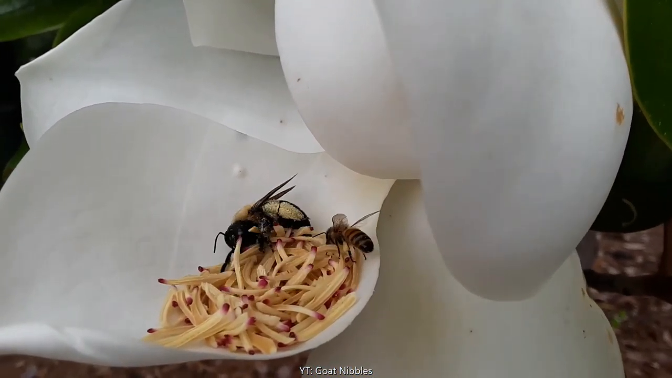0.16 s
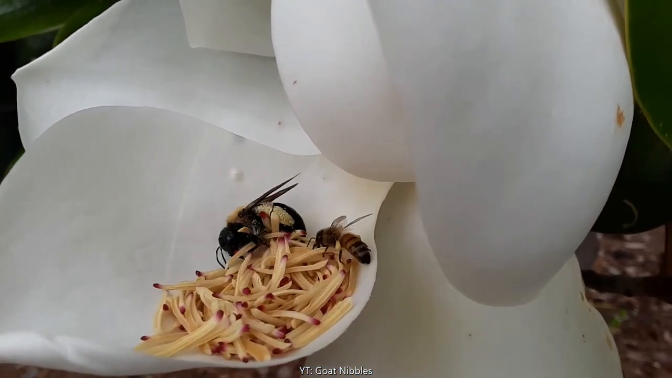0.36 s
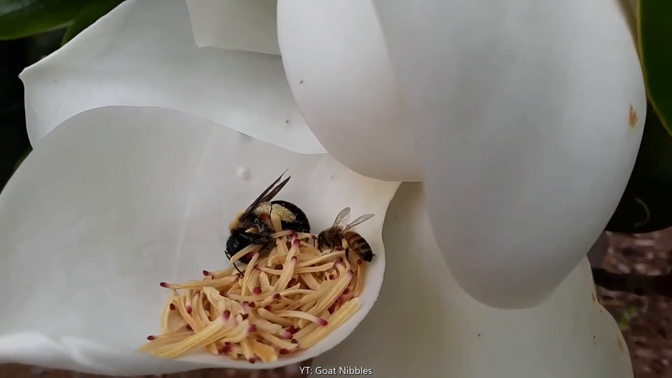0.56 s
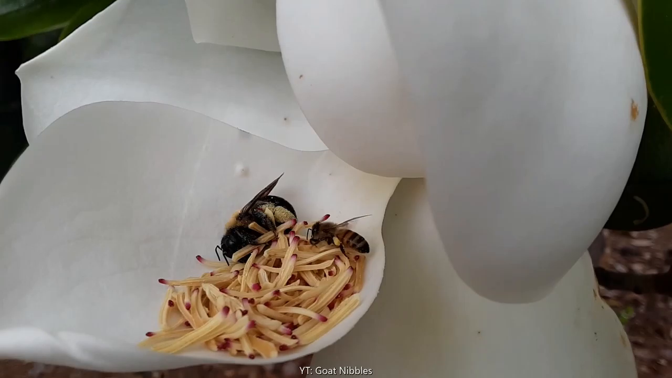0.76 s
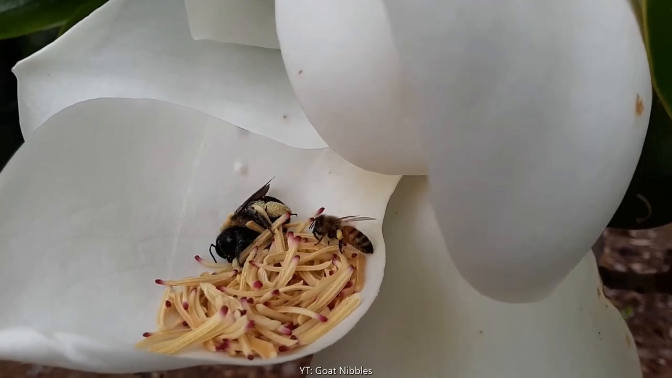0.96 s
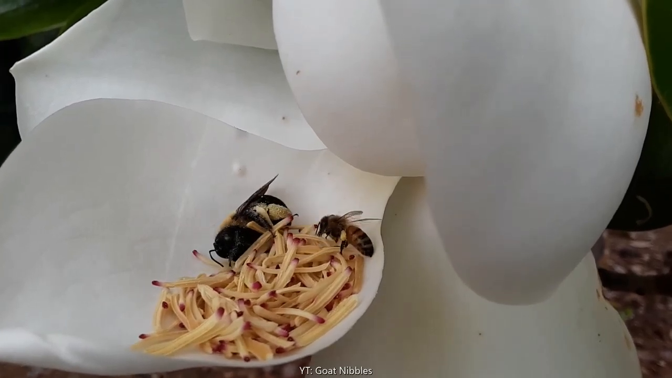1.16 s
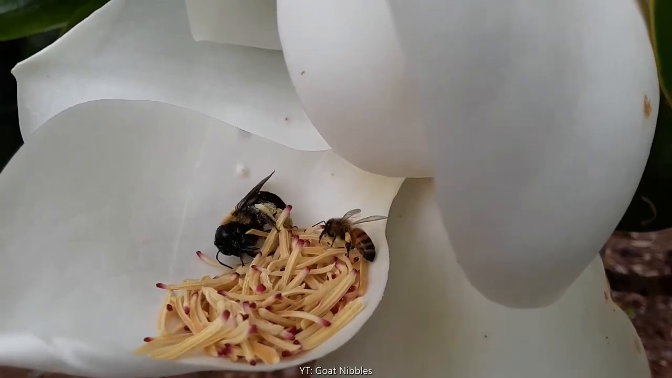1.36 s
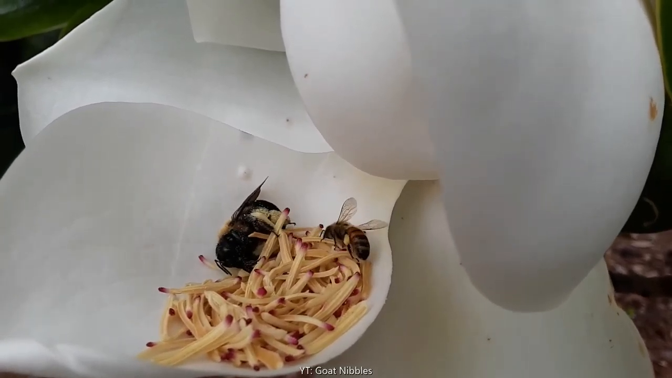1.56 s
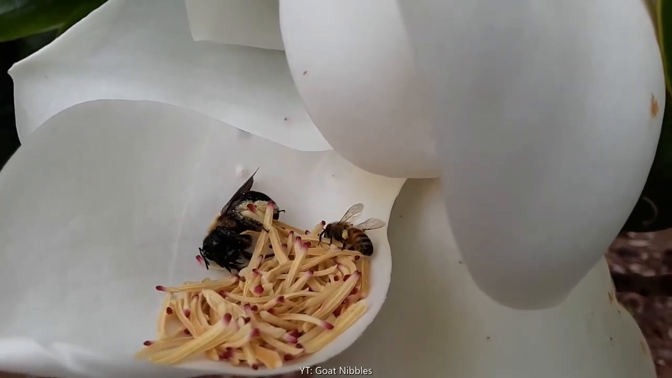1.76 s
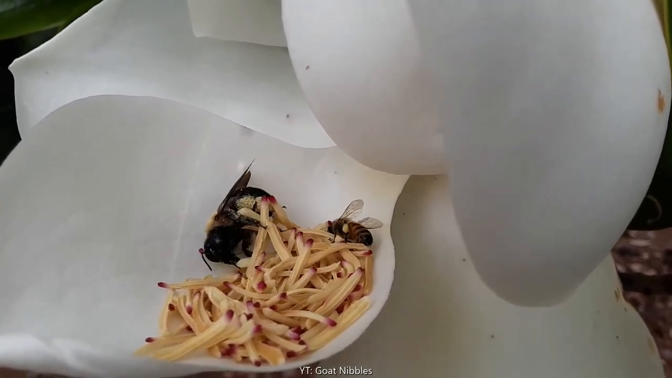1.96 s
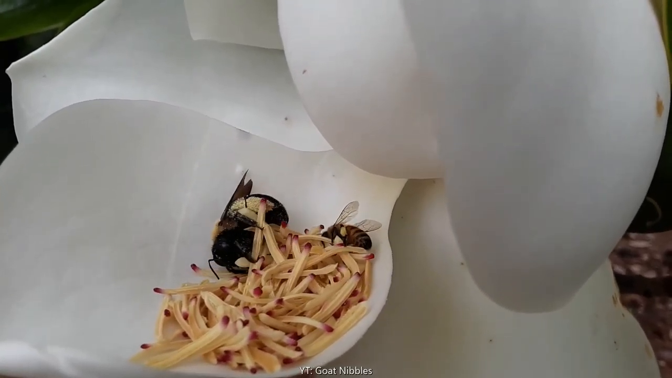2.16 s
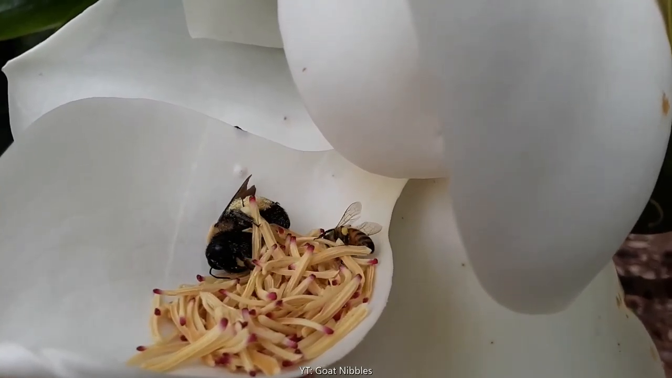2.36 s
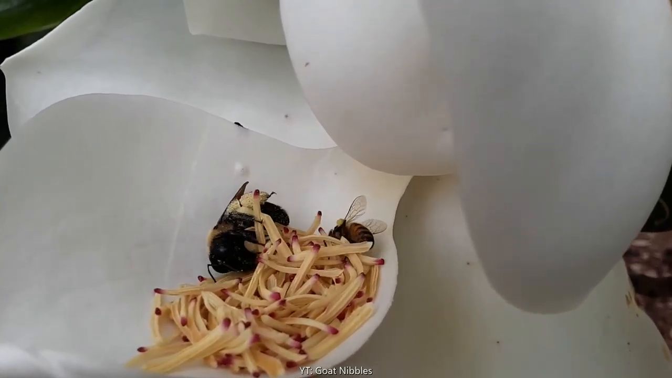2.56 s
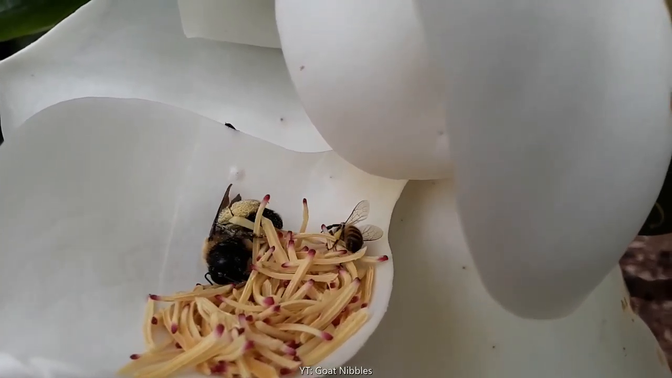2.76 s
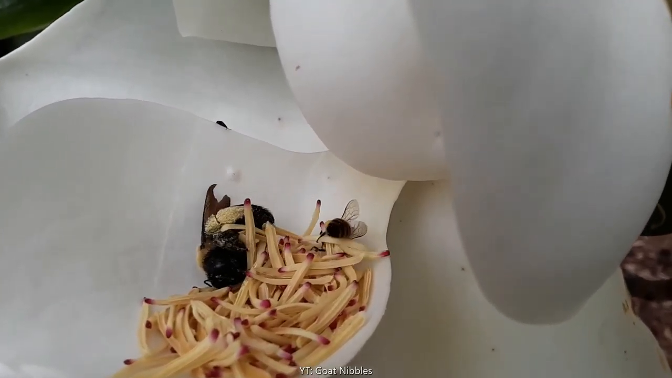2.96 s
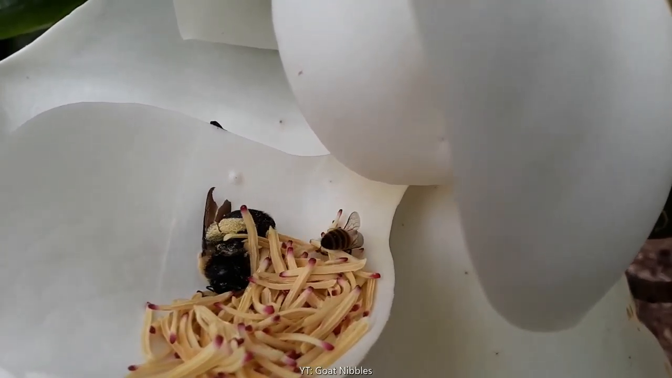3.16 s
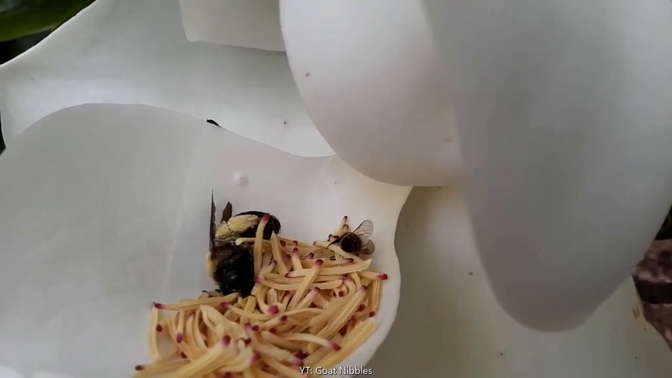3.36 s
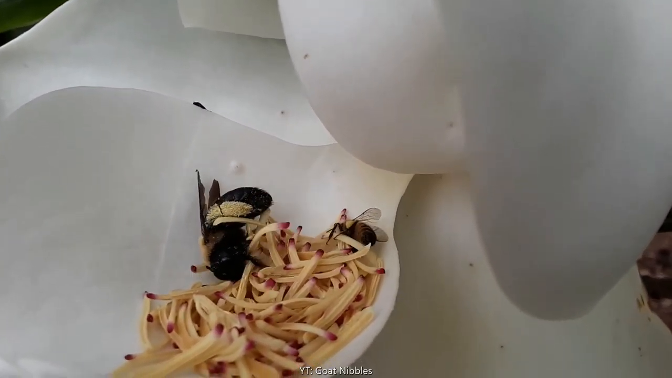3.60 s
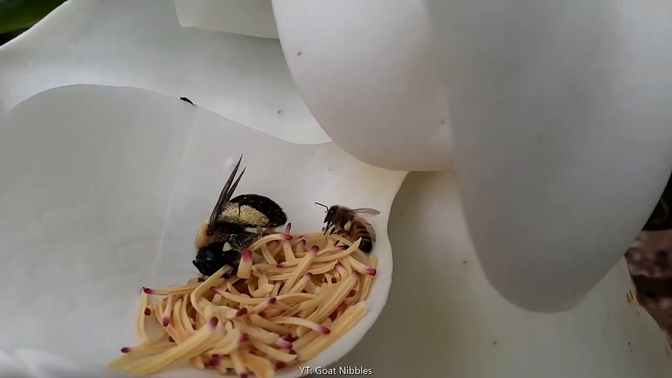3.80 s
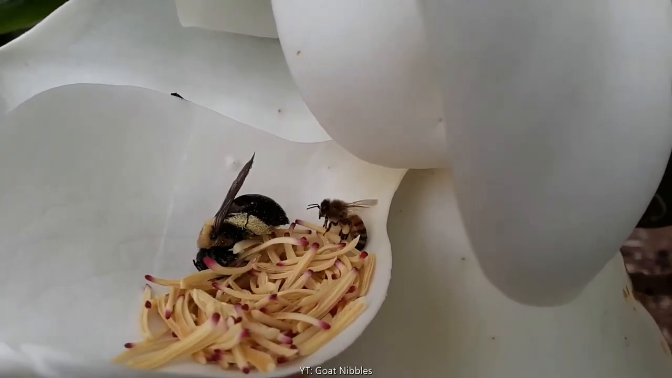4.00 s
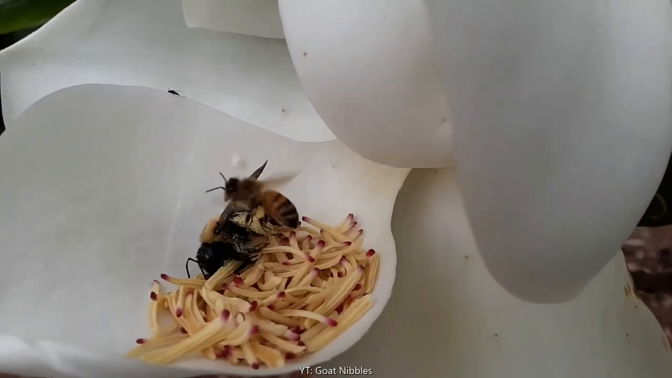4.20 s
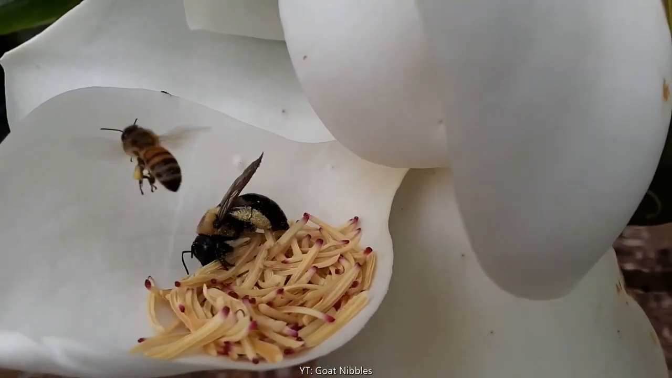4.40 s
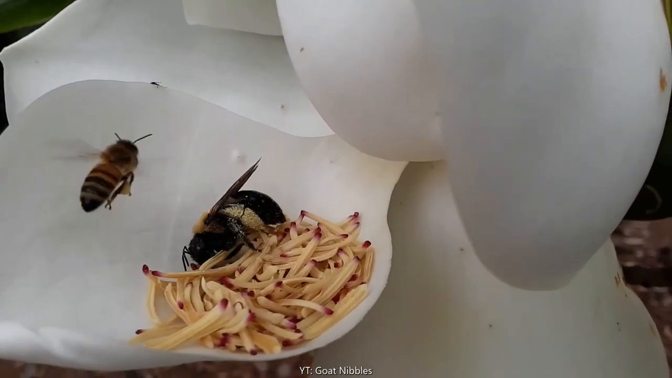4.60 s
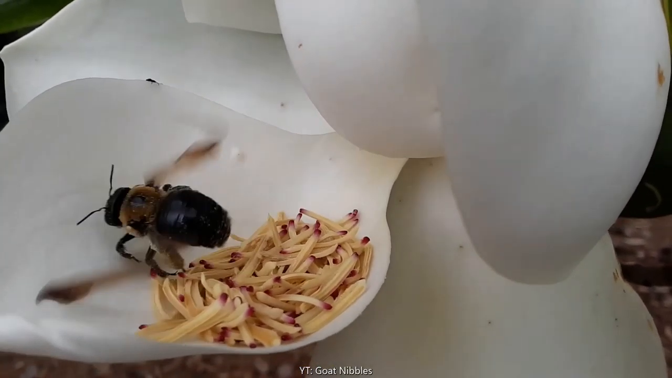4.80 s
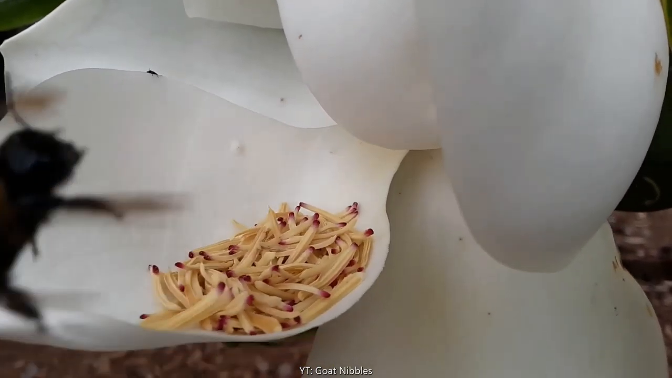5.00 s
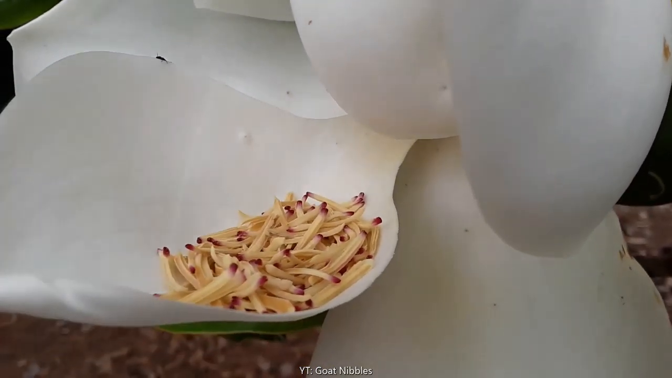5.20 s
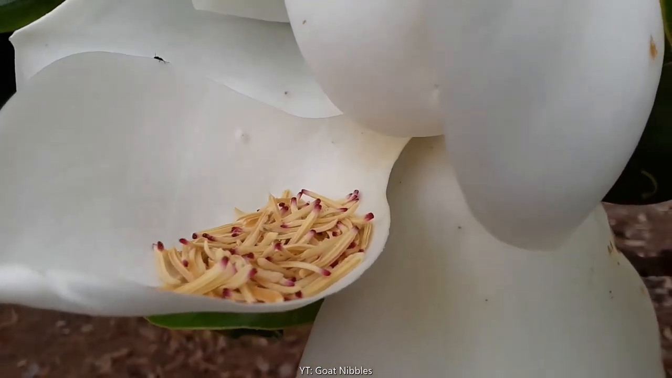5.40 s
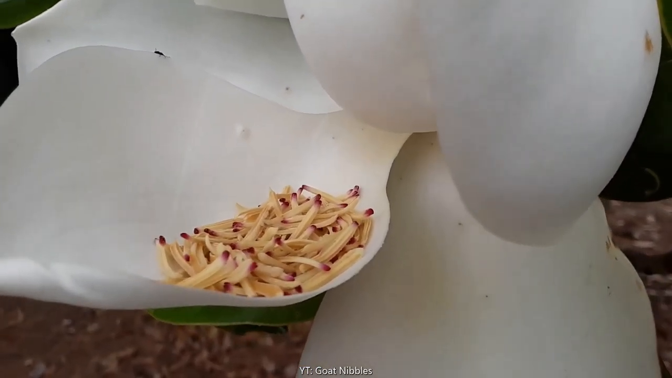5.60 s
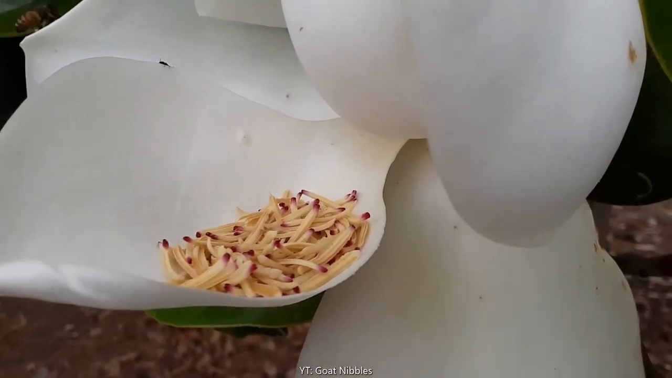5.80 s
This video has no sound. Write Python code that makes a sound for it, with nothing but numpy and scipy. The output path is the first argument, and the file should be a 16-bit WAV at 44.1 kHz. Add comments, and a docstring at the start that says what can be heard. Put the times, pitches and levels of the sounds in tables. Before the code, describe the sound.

Songbirds chirp in a quiet garden, then a honeybee lifts off and a big bee buzzes past, very close on the left.

```python
"""A quiet garden with songbirds and a far low rumble; close up, two bees rummage in a large blossom.
A honeybee lifts off and hovers with a thin buzz. A carpenter bee rattles its wings against the petal,
takes off, brushes past the left microphone port, whose air it stirs, then drones on nearby.
Its wingbeat sets the pitch; its distance sets hum, swish, wash and how far left the tone sits."""
import sys
import numpy as np
from scipy import signal
from scipy.fft import rfft, irfft, next_fast_len
from scipy.io import wavfile
from scipy.ndimage import uniform_filter1d, map_coordinates

SR = 44100
rng = np.random.default_rng(int(sys.argv[2]) if len(sys.argv) > 2 else 0)


def unload_wav(signal):
    """Save mono or channel-first audio to the path in sys.argv[1] as 16-bit WAV at rate SR, clipped to [-1, 1]."""
    wavfile.write(
        sys.argv[1],
        SR,
        np.round(np.clip(np.atleast_2d(signal).T, -1, 1) * 32767).astype(np.int16),
    )


N = 257975
T = np.arange(N) / SR

# the hardest wing slaps: t/s, relative level/dB
SLAPS = [(4.1137, -22.5), (4.119, -28.5), (4.128, -31), (4.7183, -8.5), (4.7352, -13), (4.8065, -21),
         (4.869, -11.5)]


def wing_turns():
    """The carpenter bee's wingbeats, counted from its hardest slap."""
    # wingbeat, straining at take-off and then cruising: t/s, f/Hz
    wingbeat = [(4.73, 120.4), (4.79, 129), (4.85, 122.1), (4.92, 119.2), (5.19, 120.4), (5.28, 120.9),
                (5.384, 116.3), (5.452, 119.6), (5.652, 115.3), (5.77, 120.2), (5.85, 120.6)]
    turns = np.cumsum(curves(wingbeat)[0] * (1 + 0.0037 * wobble(40))) / SR
    return turns - np.interp(SLAPS[3][0], T, turns)


def distance_cm():
    """From the carpenter bee to the left port, with the corners of its path rounded."""
    # the fly-by: t/s, distance/cm
    flight = [(4.76, 11.3), (4.85, 3.36), (4.88, 5.5), (4.925, 7.6), (4.96, 3.3), (5.05, 2.08),
              (5.09, 1.027), (5.18, 1.11), (5.24, 2.31), (5.42, 7.3), (5.64, 9.5), (5.85, 16)]
    return np.maximum(uniform_filter1d(curves(flight)[0], size=900), .5)


def carried(level_db, fall_db):
    """Gain of a carpenter bee sound: level_db at 1 cm, fall_db less for each tenfold distance."""
    return amp(level_db - fall_db * np.log10(distance_cm()))


def carpenter_bee(turns):
    """A deep hum at twice the wingbeat, its buzzing overtones, and a swish at every wing flip."""
    # buzz: multiple of the wingbeat, relative level/dB
    orders = [(1, 4.5), (3, 4), (4, 1.5), (5, 0.5), (6, -5), (7, -14.5), (8, -3), (9, -2.5), (10, -6),
              (11, -9), (12, -11), (13, -16), (14, -26), (15, -10.5), (16, -13)]
    # air off the wings: f/Hz, noise density/dB
    swish_eq = [(530, -6.5), (900, -32), (944, -8), (1120, -9), (1200, -24), (1620, -10.5), (4640, -5.5),
                (6570, -8.5), (8250, -19.5), (13300, -14), (15800, -17.5)]
    cm = distance_cm()
    port_gap_cm = 14  # the right port is this much farther away
    side_db = 38 * np.log10(1 + port_gap_cm / cm)
    closeness = np.clip((4.7 - cm) / 3.5, 0, 1)
    hum = carried(-20, fall_db=35) * unit(np.sin(2 * np.pi * 2 * turns))
    buzz = partials(turns + 0.011 * wobble(70), orders, flutter_db=4, spread=0.41)
    buzz *= carried(-30, fall_db=29.5)
    # close to the port the low partials swell more than the high ones
    buzz -= 0.53 * closeness * filtered(buzz, lambda hz: along([(600, 0.14), (950, 1)], hz))
    hum *= amp(0.81 * wobble(11))
    tone = fade_in(4.68, 0.015) * (hum * pan(side_db + 8.5) + buzz * pan(side_db - 3))
    flips = strokes(turns - .1, sharpness=13, between=.22, scatter_db=1.3)
    # near the wings the stirred air also hisses between the flips
    gate = unit(flips + 0.54 * closeness) / (1 + 0.35 * closeness)
    # each flip also starts with a crisp tick, alike from beat to beat
    beat = np.floor(turns - .13)
    ticks = unit(equalised(np.diff(beat, prepend=beat[0]), swish_eq))
    air = gate * noise(swish_eq, channels=2) + amp(-11) * ticks * amp(2 * wobble(60))
    swish = carried(-44, fall_db=13.5) * fade_in(4.94, 0.12) * air
    return tone + swish * pan(21.2)


def wing_wash(turns):
    """Within centimetres of the left port, each stroke throws a puff of air and eddies at it."""
    # tone colour of a puff: f/Hz, partial level/dB
    puff_eq = [(120, 2.5), (240, -7), (360, 4), (480, -2.5), (600, -5.5), (850, -17.5), (1300, -60),
               (2400, -42)]
    # swirling air: f/Hz, noise density/dB
    eddy_eq = [(20, -45), (40, -34), (60, -7), (140, 9.5), (200, 3), (320, 1), (500, -2.5), (900, -23),
               (1800, -23.5), (2600, -38.5), (6000, -60)]
    orders = [(k, along(puff_eq, 120 * k)) for k in range(1, 20)]
    puffs = partials(turns + 0.02 * wobble(90), orders, flutter_db=1, spread=0)
    puffs *= amp(3 * wobble(110))  # the puffs arrive unevenly
    eddies = noise(eddy_eq)[0] * strokes(turns, sharpness=1.66, between=0.65, scatter_db=2.5)
    wash = carried(-12, fall_db=68) * fade_in(4.78, 0.027) * (amp(-3.5) * puffs + amp(-5) * eddies)
    return equalised(wash, [(38, -13), (55, 0)]) * pan(41.5)  # the port passes little deep bass


def petal_rattle(turns):
    """At take-off the wings hit or brush the petal once a beat; a few slaps stand out."""
    # wings touching the petal: t/s, length/s, relative level/dB, share of clean strikes 0-1
    contacts = [(4.665, 0.028, -34, 0.34), (4.70, 0.13, -32, 0.9), (4.858, 0.013, -35, 0.11),
                (4.889, 0.053, -38.5, 0.29)]
    # wing strikes: f/Hz, noise density/dB
    strike_eq = [(500, -18), (1500, -21), (2300, -12.5), (4400, -6.5), (6500, -10.5), (8700, -9),
                 (11000, -1), (13000, 0.5), (15800, -2.5)]
    # the shaken petal's rustle: f/Hz, noise density/dB
    rustle_eq = [(150, -11), (400, -1), (700, 1), (1100, -4), (1800, -4), (2600, -12), (4200, -3),
                 (6000, -22)]
    hits = strokes(turns, sharpness=7, between=.16, scatter_db=1.5)
    brushing = strokes(turns, sharpness=1.7, between=1, scatter_db=6) * unit(amp(4.2 * wobble(700)))
    shaking, force = np.zeros(N), np.zeros(N)
    for start, length, db, striking in contacts:
        touch = amp(db) * held(start, length, attack=0.0062, release=0.019)
        shaking += touch
        force += touch * (striking * hits + (1 - striking) * brushing)
    slaps = np.zeros(N)
    for start, db in SLAPS:
        age = T - start - .001
        tick = amp(-60 * np.abs(age) / .004)
        papery_tail = amp(-12 - 60 * np.abs(age) / .016)
        slaps += amp(db - 11.5) * (tick + papery_tail) * (age > 0)
    rustle = amp(-11.5) * shaking * fade_in(4.68, 0.085) * noise(rustle_eq, channels=2)
    rattle = cupped((amp(-1.5) * force + slaps) * noise(strike_eq, channels=2))
    return (rattle + rustle) * pan(12.2)


def honeybee():
    """A higher, thinner buzz that grows and steadies as the bee climbs; hiss pulses with the wings."""
    # wingbeat: t/s, f/Hz
    wingbeat = [(4.1, 243.5), (4.234, 255), (4.252, 246.2), (4.27, 266), (4.4, 264.5), (4.426, 252.3),
                (4.492, 260.0), (4.676, 264.5), (4.75, 236.9)]
    # buzz: multiple of the wingbeat, relative level/dB
    orders = [(2, 4), (3, -0.5), (4, -5), (5, 2), (6, -13), (7, 2.5), (8, -7.5), (9, -12), (10, -14),
              (11, -4), (12, -4), (13, -13), (14, -7), (16, -15), (17, -25)]
    # air off the wings: f/Hz, noise density/dB
    hiss_eq = [(500, -15), (1500, 4.5), (2300, 1), (3000, 2), (4400, 4), (6500, -2.5), (8000, -7),
               (9500, -4), (11300, 3), (13000, -2), (15800, 0)]
    # where the hiss sits: f/Hz, left over right/dB
    hiss_side = [(1000, -0.5), (2400, 9), (4400, 5.5), (7000, 4), (10000, 46.5)]
    lift_s, hover_s, climb_s, clear_s = 4.088, 0.94, 0.47, 4.33
    flying = held(lift_s, hover_s, attack=0.014, release=0.067)
    low = 1 - fade_in(lift_s, climb_s)  # 1 among the stamens, 0 above them
    turns = np.cumsum(curves(wingbeat)[0] * (1 + (.013 + .035 * low) * wobble(90))) / SR
    shadow_db = 12.5 * (1 - fade_in(clear_s, .025))  # the blossom screens the hum at first
    hum = amp(-57.5 - shadow_db + 2 * wobble(15)) * unit(np.sin(2 * np.pi * turns))
    buzz_gain = amp(-58.5 - 10 * low + 2.43 * wobble(70))
    jitter = (0.0088 + 0.018 * low) * wobble(240)
    buzz = buzz_gain * partials(turns + jitter, orders, flutter_db=1, spread=0.98)
    scuffle = amp(-58.5) * held(lift_s, 0.047, attack=.003, release=0.028)  # wings graze the stamens
    pulse = strokes(turns, sharpness=3.1, between=0.99, scatter_db=3)
    hiss = (amp(-57) * flying + scuffle) * pulse * noise(hiss_eq, channels=2)
    hiss = filtered(hiss, lambda hz: pan(along(hiss_side, hz)))
    return flying * (hum * pan(29) + buzz * pan(24)) + cupped(hiss)


def rummaging():
    """Faint crackle as the bees push through the loose stamens."""
    # legs among the stamens: t/s, half length/s, relative level/dB
    pushes = [(0.516, 0.046, -70.5), (1.038, 0.014, -74), (1.317, 0.042, -80), (1.928, 0.026, -66.5),
              (3.3, 0.095, -78), (3.566, 0.047, -68), (3.633, 0.032, -64.5), (3.944, 0.4, -76)]
    effort = sum(amp(db) * swell(s, half) for s, half, db in pushes)
    grains = unit(amp(6.1 * wobble(360)))
    scrape = noise([(1000, -13), (3000, -4.5), (9000, -5.5), (15800, -9.5)], channels=2)
    return cupped(effort * grains * scrape) * pan(4.7)


def cupped(x):
    """Sounds made inside the blossom take on its hollow resonances."""
    # resonances of the cupped petal: f/Hz, width/Hz, boost/dB
    peaks = [(3200, 210, 5.5), (4380, 480, 6.5), (6540, 1220, 10.5), (10550, 2200, 0.5), (13200, 1200, 2.5)]
    boost_db = lambda hz: sum(db / (1 + (2 * (hz - f) / width) ** 2) for f, width, db in peaks)
    return filtered(x, lambda hz: amp(boost_db(hz)))


def birds():
    """Birds chip, glide and swoop; the farther, the more is echo."""
    # a near bird's swoop: t/s from its start, f/Hz, relative level/dB
    swoop = [(0, 5730, -22), (.014, 5870, -3.5), (.028, 6087, -1.5), (.039, 5100, -3.5), (.056, 3900, -14),
             (.073, 3110, -20), (.083, 3406, -15.5), (.096, 4880, -5), (.104, 5046, -1), (.124, 5060, -23)]
    # swoop cues: t/s, relative level/dB
    swoop_cues = [(2.747, -44.5), (2.957, -43), (3.172, -44), (3.373, -44.5)]
    # gliding calls by name: length/s, start f/Hz, middle f/Hz, end f/Hz,
    # loudest point as a share of the length, ends under the peak/dB, farness (capped at 1)
    calls = { "slur": (.16, 1950, 2170, 2300, 0.21, 10.5, 0.68),
             "blip": (0.0385, 2200, 2600, 2500, 0.43, 4.6, 1.2),
             "mew": (0.076, 2200, 2250, 2000, 0.39, 9.3, 0.65),
             "chip": (0.0164, 5700, 6600, 6600, 0.52, 11.4, 0.55),
             "rise": (.29, 3060, 4050, 5600, 1.1, 37, 0.18),
             "lisp": (.045, 5800, 7400, 7850, 0.29, 13.4, 0.67),
             "fall": (.055, 7400, 6500, 5900, 0.43, 13.3, 0.865),
             "flick": (.02, 4900, 5950, 5200, 0.43, 20, .15),
             "drop": (0.026, 6800, 5900, 4400, 0.27, 17, .15),
             "sigh": (.09, 4200, 3950, 3300, 0.51, 8.2, 0.45),
             "thin": (.16, 6100, 5970, 5900, 0.16, 6.5, .9),
             "seep": (0.048, 7850, 7700, 7450, 0.23, 14, .6),
             "lift": (.16, 3900, 5400, 6400, 0.67, 8.8, 1.1),
             "hook": (.06, 4700, 5400, 5500, 0.27, 6.9, 0.66),
             "whistle": (.23, 7580, 7350, 6750, 0.072, 4.8, 0.22), }
    # call cues: t/s, call name, relative level/dB
    call_cues = [(.03, "blip", -61.5), (.085, "slur", -60), (0.389, "lift", -64), (.48, "seep", -66),
                 (1.8, "seep", -60.5), (1.8, "thin", -62.5), (1.908, "chip", -44), (1.968, "chip", -38.5),
                 (1.996, "chip", -36.5), (2.016, "chip", -42), (2.064, "chip", -51), (2.335, "rise", -49.5),
                 (2.421, "thin", -66.5), (2.70, "lisp", -67), (2.915, "lisp", -59), (3.13, "lisp", -60),
                 (3.345, "lisp", -51), (3.353, "chip", -42.5), (3.399, "whistle", -65), (3.52, "fall", -44),
                 (3.574, "sigh", -55.5), (3.679, "flick", -42.5), (3.705, "drop", -47),
                 (3.76, "hook", -52.5), (3.795, "sigh", -55.5), (3.822, "fall", -46), (3.843, "chip", -47),
                 (3.87, "mew", -64.5), (3.893, "flick", -48), (3.924, "drop", -49.5), (3.99, "mew", -63.5),
                 (4.003, "hook", -53), (4.073, "fall", -50.5), (4.335, "lisp", -51.5),
                 (4.375, "whistle", -56)]
    rasp_near, rasp_far = 0.0024, .02
    near = sum(amp(db) * whistled(swoop, start, rasp_near) for start, db in swoop_cues)
    far = np.zeros(N)
    for start, name, db in call_cues:
        *shape, farness = calls[name]
        farness = np.clip(farness, 0, 1)
        note = amp(db) * whistled(glide(*shape), start, rasp_near + rasp_far * farness ** 2)
        near += (1 - farness) * note
        far += farness * note
    # off a few near trunks the song returns as distinct weak copies
    delays_s = rng.uniform(0.0031, 0.036, (3, 2, 1))
    copies = lambda hz: sum(np.exp(-2j * np.pi * hz * delay) for delay in delays_s)
    close = amp(-4.5) * near + filtered(amp(-13.5) * near, copies)
    distant = amp(-9) * far + trees(far, t60=.25)
    early = trees(amp(-3) * near, t60=0.075)
    late = trees(amp(-9.5) * near + amp(-6) * far, t60=0.79)
    return close + amp(-2.5) * distant + early + late


def trill():
    """A far bird repeats one upsweep evenly, growing to a peak and dropping off, blurred by trees."""
    # one upsweep: t/s from its start, f/Hz, relative level/dB
    upsweep = [(0, 3670, -7.5), (.014, 4760, -1), (.031, 5740, -3), (.04, 6300, -8), (.048, 6660, 4),
               (.068, 7600, -14)]
    period_s, peak_s, rise_db_per_s, fall_db_per_s = .0768, 0.6, 6.5, 33
    starts = -.05 + period_s * np.arange(11)
    level_db = lambda s: -57 - max(rise_db_per_s * (peak_s - s), fall_db_per_s * (s - peak_s))
    song = sum(amp(level_db(s)) * whistled(upsweep, s, rasp=0.011) for s in starts)
    return amp(-12) * song + trees(amp(-3) * song, t60=.24) + trees(amp(-3) * song, t60=1.4)


def glide(length, start_hz, middle_hz, end_hz, loudest, depth_db):
    """Rows of t/s, f/Hz, level/dB for a call that bends in one arc while it swells and fades."""
    progress = np.linspace(0, 1, 17)
    hz = np.polyval(np.polyfit([0, .5, 1], [start_hz, middle_hz, end_hz], 2), progress)
    db = -depth_db * np.interp(progress, [0, np.clip(loudest, .05, .95), 1], [1, 0, 1])
    return np.transpose([length * progress, hz, db])


def whistled(rows, start, rasp):
    """A bird note along rows of t/s, f/Hz, level/dB; rasp is its tremble as a share of the pitch."""
    t = np.arange(SR // 3) / SR
    # each note comes at a slightly new pitch and weight
    shape = np.array(rows) * [1, 1 + .005 * rng.standard_normal(), 1]
    shape[:, 2] += 2.1 * rng.standard_normal(len(shape))
    hz, db = curves(shape, t)
    hz *= 1 + rasp * signal.resample(rng.standard_normal(100), len(t))
    edge = np.clip(np.minimum(t, shape[-1, 0] - t) / 0.0012, 0, 1)
    note = np.sqrt(2) * edge * amp(db) * np.sin(2 * np.pi * np.cumsum(hz) / SR)
    return np.pad(note, (SR + round(start * SR), N))[SR:SR + N]


def trees(x, t60):
    """Scattered echoes from trunks and leaves, different at each port."""
    t = np.arange(SR) / SR
    tail = rng.standard_normal((2, SR)) * amp(-60 * t / t60) * (1 - np.exp(-t / 0.0008))
    return signal.fftconvolve(x[None], tail / np.linalg.norm(tail[0]), axes=1)[:, :N]


def far_whine():
    """A faint whine whose second and third partials carry, brighter and less steady while loud."""
    # whine cues: t/s, length/s, relative level/dB
    cues = [(0, 0.364, -62.5), (0.422, 1.4, -74)]
    pitch_hz = 575.7
    gain = sum(amp(db) * held(s, length, attack=0.012, release=.04) for s, length, db in cues)
    loud = gain / gain.max()
    phase = 2 * np.pi * np.cumsum(pitch_hz * (1 + (.018 + .03 * loud) * wobble(60))) / SR
    tone = np.sin(2 * phase) + amp(-1) * loud * np.sin(3 * phase)
    return trees(amp(-8) * gain * tone, t60=0.32)


def garden():
    """The bed: far rumble, a low drone that joins it, distant birds, a thin whine and even hiss."""
    # far rumble: f/Hz, noise density/dB
    rumble_eq = [(15, -45), (25, -29), (59, -13), (98, -3), (123, 0), (401, -23.5), (448, -17), (576, -30),
                 (700, -24.5), (910, -41), (1540, -120)]
    # its swells: t/s, half length/s, boost/dB
    swells = [(0.271, 0.19, 7.5), (.8, .25, 3), (1.952, 0.23, 3.5)]
    # blur of distant birds: f/Hz, noise density/dB
    chorus_eq = [(3000, -16.5), (4200, -7), (5800, -1), (6700, -1.5), (7700, -22), (9000, -41)]
    # faint hiss: f/Hz, noise density/dB
    hiss_eq = [(300, 5), (700, -0.5), (2000, 2.5), (3500, 1), (7000, -11), (8200, -5), (10000, -3),
               (15800, -2)]
    rumble_db = -71 + sum(db * swell(s, half) for s, half, db in swells) + wobble(7.06)
    rumble = amp(rumble_db) * (0.5 * noise(rumble_eq, channels=2) + noise(rumble_eq))
    drone_eq = [(60, -36), (128, -13.5), (150, -4.5), (178, -14.5), (400, -28.5), (1000, -86)]
    drone = amp(-60) * held(3.44, 1.78, attack=0.82, release=0.22) * noise(drone_eq, channels=2)
    chorus = amp(-72 + wobble(8.2)) * noise(chorus_eq, channels=2)
    return rumble + drone + chorus + far_whine() + amp(-71) * noise(hiss_eq, channels=2) * pan(2.1)


def partials(turns, orders, flutter_db, spread):
    """Wingbeat multiples, wavering as the insect turns; with no phase spread, one pulse a beat."""
    return unit(sum(
        amp(db + flutter_db * wobble(16)) * np.sin(2 * np.pi * (k * turns + spread * rng.random()))
        for k, db in orders))


def strokes(turns, sharpness, between, scatter_db):
    """A gate of rms 1 that swells and dies once a wingbeat, each time by another amount."""
    sizes = amp(scatter_db * rng.standard_normal(4096))[np.floor(turns).astype(int) % 4096]
    age = 2 * sharpness * (turns % 1)
    return unit(sizes * age * np.exp(1 - age) + between)


def amp(db):
    """Decibels to gain."""
    return 10 ** (np.asarray(db) / 20)


def unit(x):
    """Scaled to rms 1."""
    return x / np.sqrt(np.mean(x ** 2) + 1e-20)


def along(points, hz):
    """Points of f/Hz, value, read on a log frequency axis."""
    f, values = np.transpose(points)
    return np.interp(np.log(hz + 1), np.log(f + 1), values)


def curves(rows, t=T):
    """One value per sample for each column after the time."""
    times, *columns = np.transpose(rows)
    return [np.interp(t, times, column) for column in columns]


def fade_in(start, length):
    """A ramp from silence to full level."""
    return np.clip((T - start) / length, 0, 1)


def held(start, length, attack, release):
    """An envelope that rises, holds and dies away; times in seconds."""
    return fade_in(start, attack) * np.exp(-np.maximum(T - start - length, 0) / release)


def swell(centre, half):
    """A bell-shaped envelope."""
    return np.exp(-((T - centre) / half) ** 2)


def wobble(rate):
    """A smooth random curve, rate knots a second."""
    return map_coordinates(rng.standard_normal(int(N * rate / SR) + 4), [T * rate])


def filtered(x, response):
    """x shaped by a response of frequency."""
    size = next_fast_len(N + 8192)
    return irfft(rfft(x, size) * response(np.fft.rfftfreq(size, 1 / SR)), size)[..., :N]


def equalised(x, eq):
    """x through an EQ curve of f/Hz, gain/dB."""
    return filtered(x, lambda hz: amp(along(eq, hz)))


def noise(eq, channels=1):
    """Coloured noise of rms 1, unrelated between channels."""
    return unit(equalised(rng.standard_normal((channels, N)), eq))


def pan(side_db):
    """Left and right gains whose mean is 1; positive is left."""
    ratio = np.atleast_1d(amp(side_db))
    return 2 * np.array([ratio, np.ones_like(ratio)]) / (1 + ratio)


def scene():
    """Both bees in front of the garden."""
    turns = wing_turns()
    big_bee = carpenter_bee(turns) + wing_wash(turns) + petal_rattle(turns)
    return big_bee + honeybee() + rummaging() + trill() + birds() + garden()


def record(dry):
    """The loudest puffs are softly clipped; the top is cut at 15.9 kHz."""
    clipped = dry / (1 + np.abs(dry) ** 6) ** (1 / 6)
    return filtered(clipped, lambda hz: hz < 15900)


dry = scene()
out = record(dry)
unload_wav(out)
```